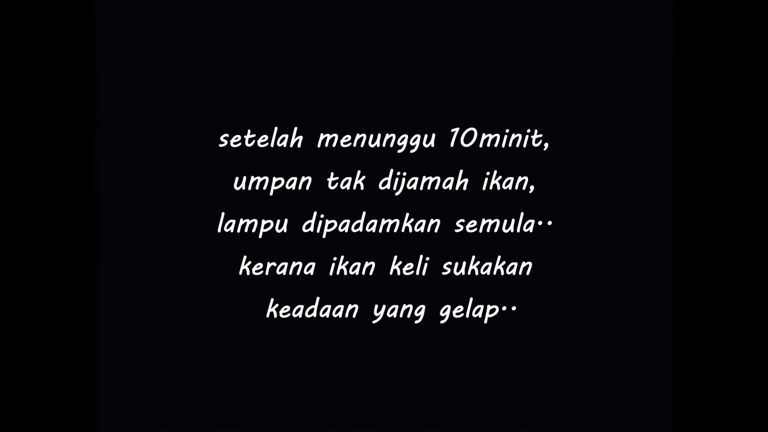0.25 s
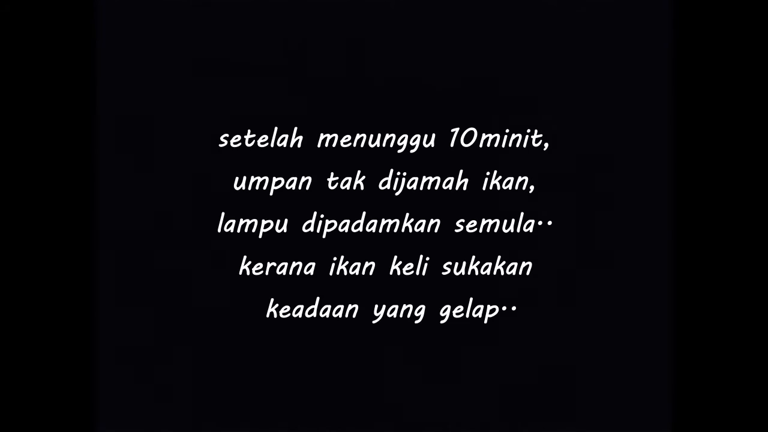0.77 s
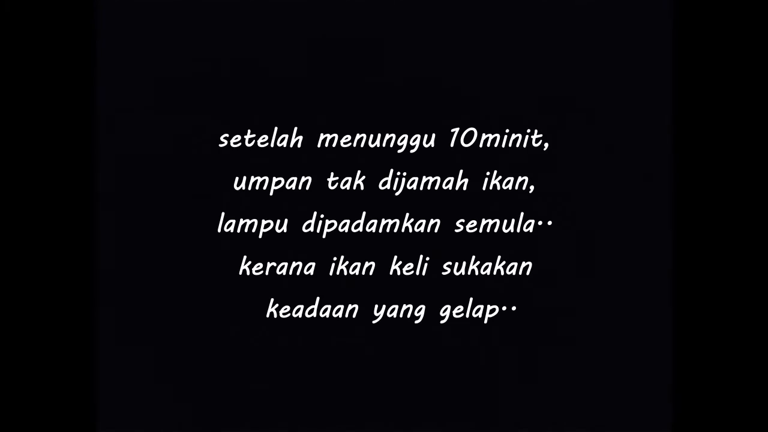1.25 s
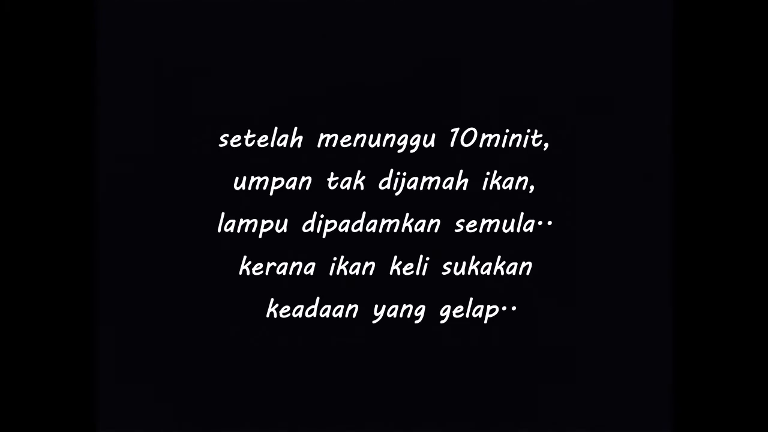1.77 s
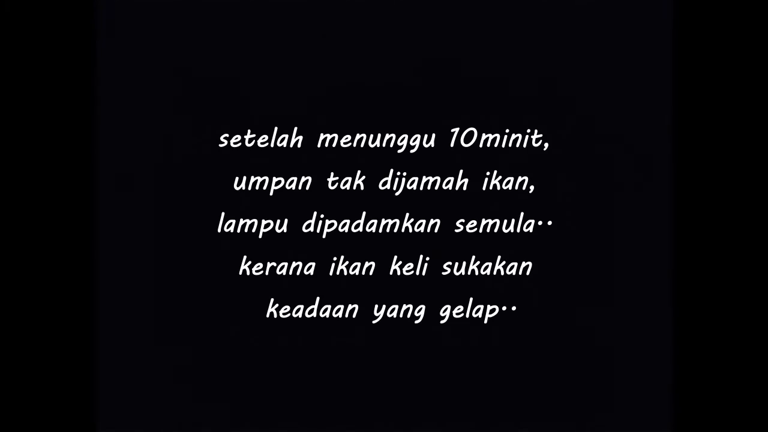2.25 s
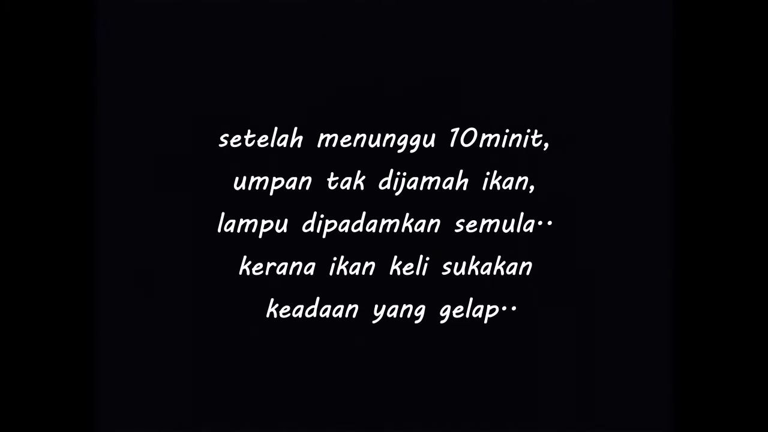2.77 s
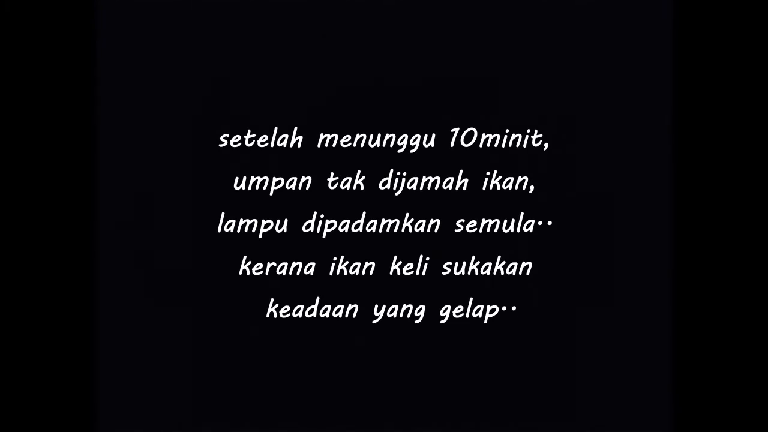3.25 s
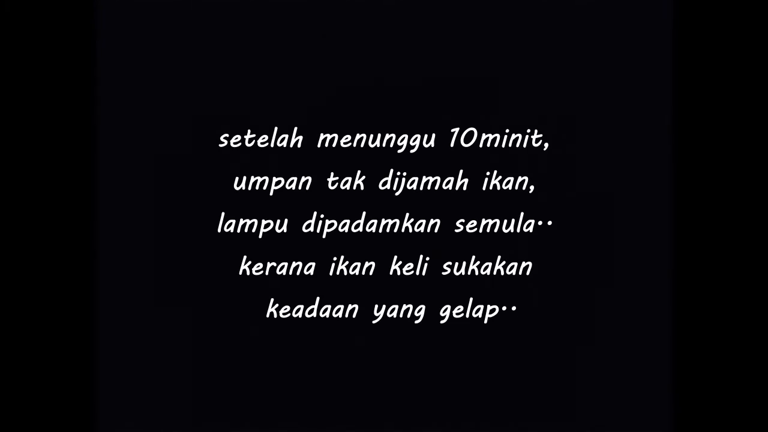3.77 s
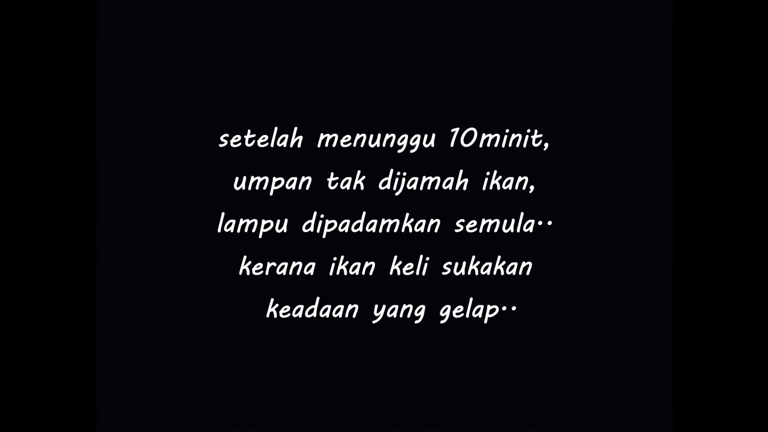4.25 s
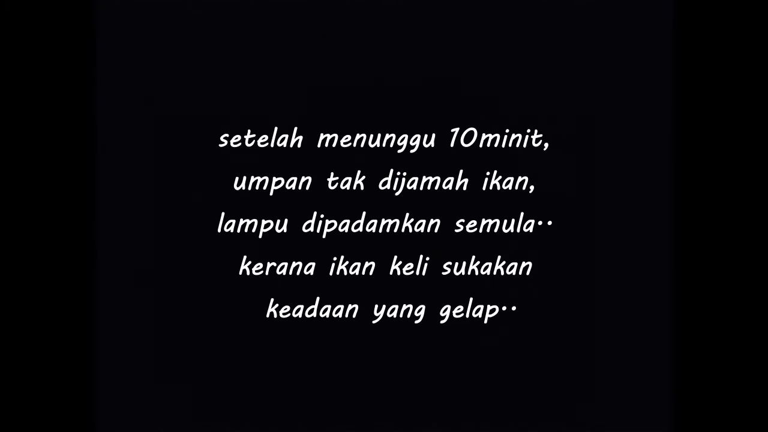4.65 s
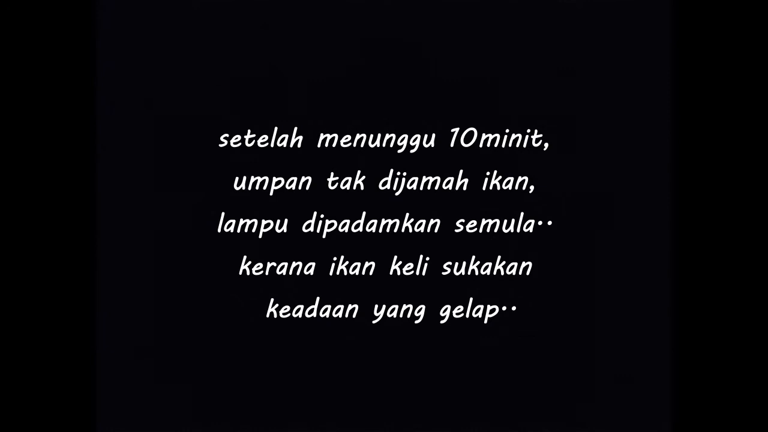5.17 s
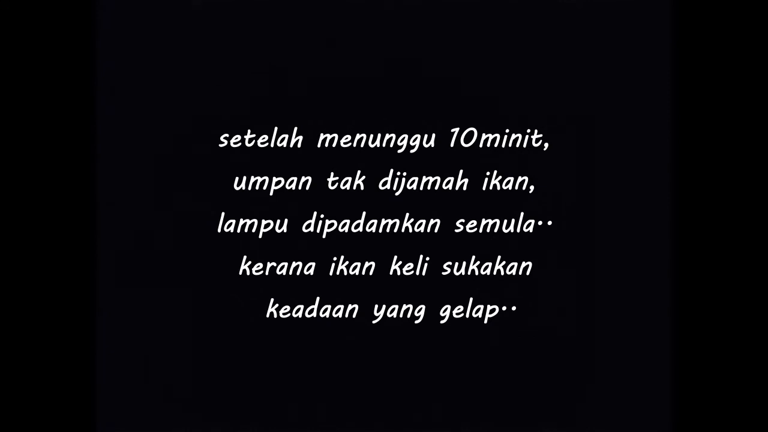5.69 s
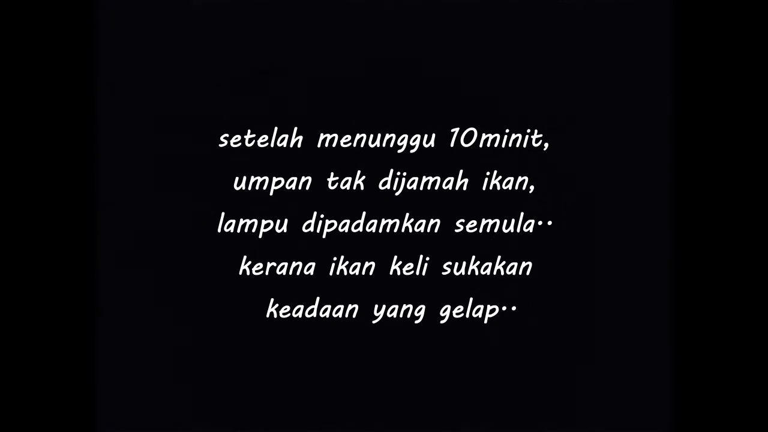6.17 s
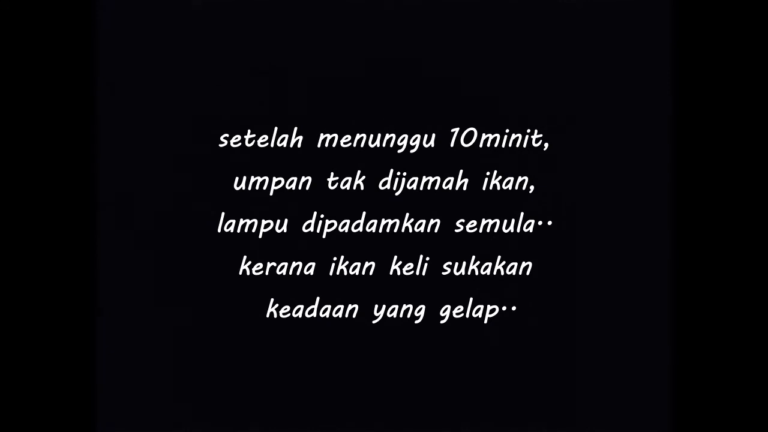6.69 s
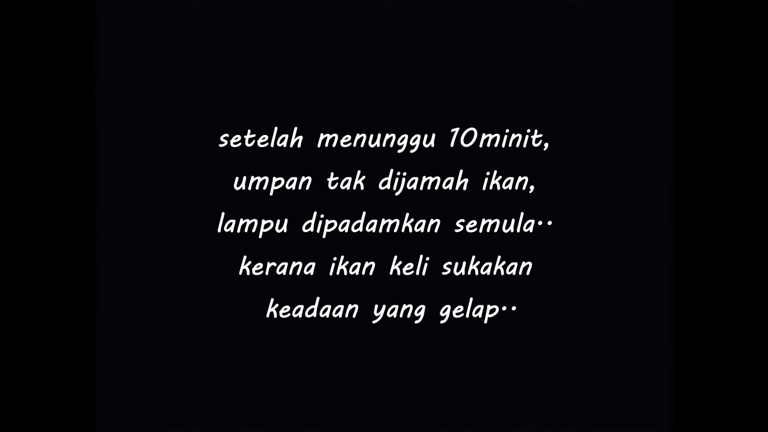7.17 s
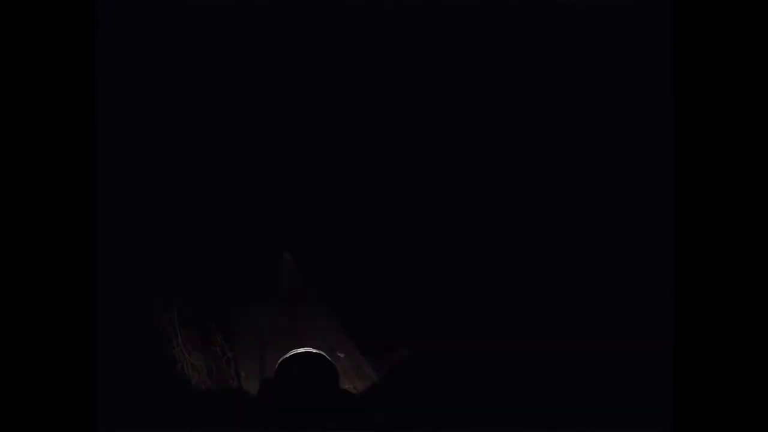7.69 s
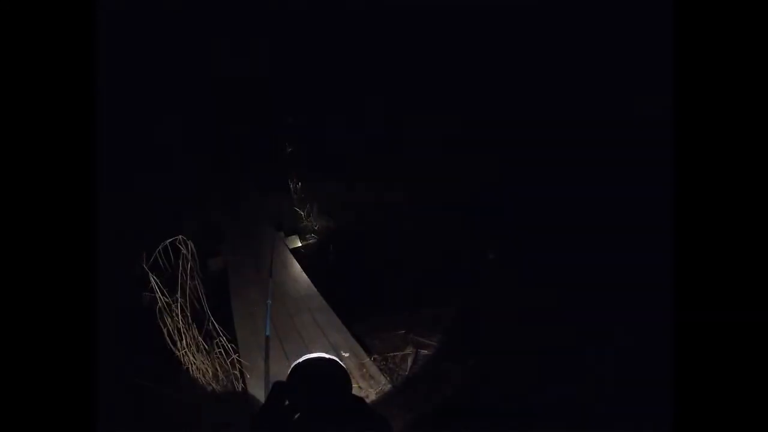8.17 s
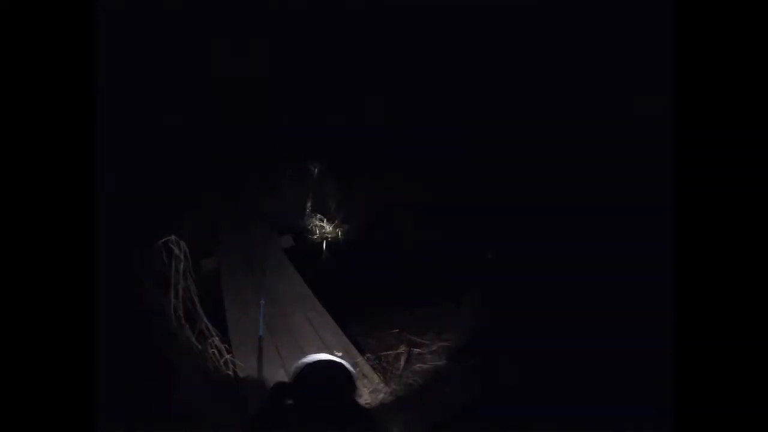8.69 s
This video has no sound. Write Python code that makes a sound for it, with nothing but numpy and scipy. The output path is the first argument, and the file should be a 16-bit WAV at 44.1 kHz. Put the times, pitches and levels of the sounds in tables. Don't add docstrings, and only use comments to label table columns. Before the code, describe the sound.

A quiet night outdoors beside a ditch. From 0 s a dense far insect chorus hisses above low rumbling traffic, with a motor swelling around 1.3 s. A cricket trills roughly 28 strokes a second, stronger from 1.7 to 2.5 s, resting until about 3.4 s, then running on. Mid-distance crickets chirp in threes early and again after 6.5 s; katydids buzz in short bursts, and a faint far frog croaks every second or so. Between 5.6 and 6.3 s a close field cricket gives bright falling chirps. At about 7.26 s the whole night abruptly becomes much louder. Fingers rub and tick a small plastic lamp close to the microphone until 7.8 s, with hard overloaded switch snaps at 7.58 and 7.77 s. A very brief dip follows, then loud overlapping chirps, motor hum and the trill returning at 8.2 s, continuing to 8.9 s.

```python
import sys
import numpy as np
from scipy import signal
from scipy.fft import rfft, irfft, next_fast_len
from scipy.io import wavfile
from scipy.ndimage import uniform_filter1d

SR = 44100
rng = np.random.default_rng(int(sys.argv[2]) if len(sys.argv) > 2 else 0)


def voltage_ratio(decibels):
    exponent = np.asarray(decibels, float) / 20
    return 10 ** exponent


def unload_audio(sound):
    columns = np.transpose(np.atleast_2d(sound))
    steps = np.round(np.clip(columns, -1, 1) * 32767)
    wavfile.write(sys.argv[1], SR, steps.astype(np.int16))


N = 393813
TIME = np.arange(N) / SR
PADDED = next_fast_len(N)
LOUDER_S, LOUDER_DB = 7.2567, 19


def noise():
    return rng.standard_normal(N)


def curve(rows, outside_db=None):
    s, db = np.transpose(rows)
    return np.interp(TIME, s, db, left=outside_db, right=outside_db)


def passband(x, low_hz, high_hz, order=2):
    return signal.sosfilt(signal.butter(order, [low_hz, high_hz], "band", fs=SR, output="sos"), x)


def band(x, low_hz, high_hz, order=2):
    out = passband(x, low_hz, high_hz, order)
    return out / np.sqrt(np.mean(out ** 2))


def coloured(x, spectrum):
    hz, db = np.transpose(spectrum)
    bins = np.fft.rfftfreq(PADDED, 1 / SR) + 1e-9
    gain = voltage_ratio(np.interp(np.log(bins), np.log(hz), db, left=-90, right=-90))
    out = irfft(rfft(x, PADDED) * gain, PADDED)[:N]
    return out / np.sqrt(np.mean(out ** 2))


def drift(rate):
    knots = rng.standard_normal(int(N / SR * rate) + 2)
    return np.interp(TIME * rate, np.arange(len(knots)), knots) * np.sqrt(3 / 2)


def place(rows, shape):
    s, db = np.transpose(rows)
    marks = np.zeros(N)
    np.add.at(marks, np.clip((s * SR).astype(int), 0, N - 1), voltage_ratio(db))
    return signal.fftconvolve(marks, shape, "same")


def beats(rows, jitter_s, jitter_db):
    s, per_s, db = np.transpose(rows)
    runs = []
    for a, b, rate in zip(s, s[1:], per_s):
        count = max(round((b - a) * rate), 1)
        runs.append(np.linspace(a, b, count, endpoint=False))
    at = np.append(np.concatenate(runs), s[-1])
    jitter = rng.standard_normal((len(at), 2)) * [jitter_s, jitter_db]
    return np.transpose([at, np.interp(at, s, db)]) + jitter


def chirps(rows, strokes):
    return (np.array(rows)[:, None] + strokes).reshape(-1, 2)


def stroke(start_hz, end_hz, length, bend=1.0, peak_at=0.95, pointed=1.75):
    part = np.linspace(0, 1, int(length * SR))
    phase = 2 * np.pi * np.cumsum(start_hz + (end_hz - start_hz) * part ** bend) / SR
    swell = np.abs(np.sin(np.pi * part ** peak_at)) ** pointed
    return swell * np.sin(phase)


def scatter(x, t60, wet_db):
    age = np.arange(int(t60 * SR)) / SR
    echoes = rng.standard_normal(len(age)) * voltage_ratio(-60 * age / t60) * np.minimum(age / 0.015, 1)
    echoes /= np.sqrt(np.sum(echoes ** 2))
    return x + voltage_ratio(wet_db) * signal.fftconvolve(x, echoes)[:N]


# frequency in Hz, density in dB per Hz.
AIR_COLOUR = [(12, -59), (20, -11), (65, -2), (129, -15.5), (145, -7), (161, -4), (189, -10), (276, -25),
              (556, -30.5), (814, -23), (1010, -32), (1670, -34), (2400, -35), (3120, -68), (5280, -120)]


def air():
    return voltage_ratio(-59.5) * coloured(noise(), AIR_COLOUR)


# time in seconds, level in dB above its usual.
TRAFFIC_SWELL = [(0, -2.5), (1.1, 11.5), (1.87, -1), (2.5, 5.5), (3.2, -7), (3.9, 4.5), (4.5, -7), (5.6, 6),
                 (5.9, -3.5), (7.25, -6), (7.28, 4.5), (8.93, 3.5)]
# low edge in Hz, high edge in Hz, usual level in dB, share of the traffic's swing.
MOTOR_HUMS = [(58.9, 67.3, -67, 1.0), (81.3, 88, -71, 0.77), (153.7, 160, -66, -0.43),
              (127.5, 142, -75, 0.96), (102.5, 110, -75.5, 0.85)]


def motors():
    near_db = curve(TRAFFIC_SWELL)
    return sum(voltage_ratio(db + share * near_db) * band(noise(), low_hz, high_hz)
               for low_hz, high_hz, db, share in MOTOR_HUMS)


# time in seconds, firing rate in Hz, level in dB.
ENGINE_COURSES = [
    [(0.35, 93.1, -78), (0.5, 93.1, -68), (1.33, 91.6, -52), (1.64, 91.9, -61), (1.8, 89.8, -73)],
    [(7.25, 58.0, -57), (7.86, 62.0, -53), (8.32, 64.5, -50), (8.5, 59.0, -57), (8.62, 54.0, -72)],
    [(7.25, 84.94, -67.5), (8.1, 85.6, -65), (8.93, 83.7, -75)],
]
# multiple of the firing rate, level in dB.
ENGINE_OVERTONES = [
    [(1, -3), (1.5, -6), (2, -10.5)],
    [(1, -0.5), (2, -15.5), (3, -25.5)],
    [(1, 4.5), (1.25, -15), (1.8, -3)],
]


def engines():
    out = 0
    for course, orders in zip(ENGINE_COURSES, ENGINE_OVERTONES):
        s, hz, db = np.transpose(course)
        turn = 2 * np.pi * np.cumsum(np.interp(TIME, s, hz) * (1 + 0.0124 * drift(5))) / SR
        tones = sum(voltage_ratio(order_db + 2.0 * drift(4.2)) * np.sin(multiple * turn) for multiple, order_db in orders)
        out = out + np.sqrt(2) * voltage_ratio(np.interp(TIME, s, db, left=-140, right=-140)) * tones
    return out


# middle in seconds, length in seconds, pitch in Hz, level in dB.
FAR_WHINES = [
    (0.07, .2, 652, -74),
    (1.15, .45, 597, -78),
    (2.02, 0.22, 597, -76),
    (3.4, .5, 598, -80),
    (2.66, .15, 395, -80),
    (8.0, 0.1, 500, -77),
    (8.267, 0.25, 360, -76),
]


def whines():
    out = 0
    for s, length, hz, db in FAR_WHINES:
        swell = np.cos(np.pi * np.clip((TIME - s) / length, -0.5, 0.5))
        out = out + voltage_ratio(db) * swell * np.sin(2 * np.pi * hz * TIME)
    return out


def crowd(per_s, start_hz, end_hz, length):
    strokes = (rng.random(N) < per_s / SR) * voltage_ratio(1.6 * noise())
    song = signal.fftconvolve(strokes, stroke(start_hz, end_hz, length), "same")
    out = scatter(song, t60=0.15, wet_db=-4)
    return out / out.std()


# frequency in Hz, density in dB per Hz.
CHORUS_COLOUR = [(2300, -54.5), (2800, -14.5), (3250, -7), (3800, -26.5), (4350, -5.5), (4650, -0.5),
                 (5300, -2.5), (5650, -12), (6050, -22.5), (6450, -7), (6850, -7.5), (7150, -9),
                 (9300, -12.5), (10300, -28), (11500, -45)]
# time in seconds, level in dB.
SLOW_SWELL = [(0, -40.5), (1.5, -41), (2.6, -42.5), (3.3, -43.5), (3.6, -43), (5.6, -40.5), (6.5, -42.5),
              (7.2, -41), (7.7, -43.5), (8.15, -44.5), (8.93, -41.5)]
FIELD_SWELL = [(0, -45), (1.5, -45.5), (5.6, -47), (6.5, -45.5), (7.7, -45.5), (8.2, -48), (8.93, -45.5)]
HIGH_SWELL = [(0, -43), (4.5, -42.5), (7.2, -43.5), (7.7, -44), (8.2, -43.5), (8.93, -43.5)]


def chorus():
    hiss = coloured(noise(), CHORUS_COLOUR)
    low = voltage_ratio(-16) * crowd(60.0, 3500, 2900, 0.04)
    low += voltage_ratio(-24) * crowd(18.0, 3050, 2600, 0.05)
    middle = voltage_ratio(-9.5) * crowd(130.0, 5750, 4500, 0.028)
    high = voltage_ratio(-13) * crowd(160.0, 7150, 6350, 0.012)
    high += voltage_ratio(-14) * crowd(200.0, 8800, 7200, 0.015)
    layers = [(2000, 3750, SLOW_SWELL, low, 1.5),
              (3750, 6050, FIELD_SWELL, middle, 1.1),
              (6050, 9900, HIGH_SWELL, high, 0.8),
              (9900, 12000, HIGH_SWELL, 0, 1.0)]
    out = 0
    for low_hz, high_hz, swell, singers, patchy_db in layers:
        sos = signal.butter(3, [low_hz, high_hz], "band", fs=SR, output="sos")
        part = signal.sosfiltfilt(sos, hiss)
        out = out + (part + singers) * voltage_ratio(curve(swell) + patchy_db * drift(3))
    return out


# pitch in Hz, early level in dB rms, late level in dB rms.
TRILLER_LINES = [(4408, -72, -64), (4478, -66, -62), (4545, -65, -68), (4619, -60, -61), (4694, -62, -62),
                 (5427, -67, -68), (5559, -59, -68), (5645, -70, -70), (5685, -64, -64), (5773, -72, -76),
                 (5812, -68, -70), (5905, -73, -76), (5947, -70, -76), (6035, -78, -74)]


def fast_trillers():
    out = 0
    for hz, early_db, late_db in TRILLER_LINES:
        db = np.where(TIME > LOUDER_S, late_db, early_db) + 2.5 + 2.3 * drift(4.5)
        out = out + voltage_ratio(db) * np.sin(2 * np.pi * hz * TIME + 1.0 * drift(4.4))
    return out


# middle of the croak in seconds, level in dB.
FROG_CROAKS = [
    (1.17, -66),
    (2.38, -68),
    (3.67, -66),
    (5.08, -66),
    (6.55, -68),
    (7.84, -74),
    (8.9, -64.5),
]


def frog():
    return place(FROG_CROAKS, np.hanning(int(0.27 * SR))) * band(noise(), 2080, 2600, order=1) * voltage_ratio(-3.5)


# middle of the swell in seconds, swells per second, level in dB.
RASP_SWELLS = [
    (3.25, 1.4, -70),
    (4.69, 1.41, -68),
    (6.82, 0, -69),
]


def rasp():
    swell = np.sin(np.pi * np.linspace(0, 1, int(0.45 * SR)) ** 2.5) ** 2
    return place(beats(RASP_SWELLS, jitter_s=0.01, jitter_db=4.0), swell) * band(noise(), 10150, 10700)


def buzz(rows, start_hz, end_hz, length, per_s, duty, wet_db, waver=0.02):
    beat = np.cumsum(per_s * (1 + waver * drift(6))) / SR
    scrapes = np.diff(np.floor(beat), prepend=0) * voltage_ratio(2.0 * drift(90))
    burst = signal.windows.tukey(int(length * SR), 0.55)
    gate = place(beats(rows, jitter_s=0.005, jitter_db=0.7), burst)
    song = signal.fftconvolve(gate * scrapes, stroke(start_hz, end_hz, duty / per_s), "same")
    return scatter(song, t60=0.06, wet_db=wet_db)


# middle of the burst in seconds, bursts per second, level in dB.
HIGH_BURSTS = [(0.025, 7.6, -52.5), (0.678, 7.6, -53), (1.204, 0, -52), (1.43, 7.9, -53), (2.188, 7.8, -53),
               (2.826, 0, -53), (2.97, 7.6, -53), (3.757, 7.8, -50.5), (4.265, 7.6, -51), (5.19, 7.3, -51),
               (5.871, 7.6, -52), (7.195, 7.3, -52), (7.332, 7.2, -55), (7.745, 7.7, -55),
               (8.914, 0, -55.5)]
LOW_BURSTS = [
    (0.13, 4.8, -58),
    (1.382, 4.8, -57),
    (2.422, 4.85, -56.5),
    (4.497, 4.85, -56.5),
    (7.166, 0, -57.5),
    (7.33, 4.8, -59.5),
    (8.8, 0, -58.5),
]
SLOW_BURSTS = [
    (0.07, 3.0, -49),
    (1.39, 3, -50),
    (2.08, 3.1, -52.5),
    (4.036, 3.1, -51.5),
    (5.93, 3.1, -51),
    (7.22, 3.1, -52),
    (8.803, 0, -53.5),
]


def katydids():
    high = buzz(HIGH_BURSTS, 10200, 8450, 0.105, per_s=121, duty=0.9, wet_db=-3, waver=0.035)
    low = buzz(LOW_BURSTS, 4600, 3650, 0.15, per_s=83, duty=0.7, wet_db=-5)
    swells = place(beats(SLOW_BURSTS, jitter_s=0.01, jitter_db=1.0), np.hanning(int(0.3 * SR)))
    breath = swells * band(noise(), 7500, 8820, order=4) * voltage_ratio(-4.5)
    scrape = buzz(SLOW_BURSTS, 8520, 7900, 0.25, per_s=202.6, duty=0.9, wet_db=-3, waver=0.004)
    return voltage_ratio(6.5) * high + voltage_ratio(5.0) * low + voltage_ratio(3.5) * breath + voltage_ratio(2.5) * scrape


# time in seconds, peak level in dB.
SLOW_SINGLES = [(2.546, -53), (2.607, -54), (2.672, -47), (2.745, -46), (2.92, -50), (2.989, -46),
                (3.065, -45), (3.13, -53), (3.2, -53), (3.318, -47), (7.65, -51), (7.715, -52),
                (7.753, -52), (7.825, -51), (7.858, -52), (7.886, -48), (7.905, -52), (7.935, -53),
                (7.959, -48), (8.015, -53), (8.16, -53)]
# last stroke of the chirp in seconds, peak level in dB.
LOW_CHIRPS = [(0.17, -63), (0.326, -57), (0.806, -58), (1.425, -59), (2.02, -60), (2.163, -59), (2.63, -58),
              (3.212, -57), (3.318, -59), (3.748, -55), (3.907, -58), (4.472, -60), (4.88, -57),
              (5.07, -60), (5.307, -59), (5.728, -59), (5.982, -59), (6.263, -60), (6.967, -57),
              (7.494, -60), (7.86, -59), (8.039, -60), (8.6, -60)]
# seconds from the chirp's time, level in dB.
LOW_PATTERN = [
    (-0.14, -6),
    (-0.07, -2.5),
    (0, 0),
]


def slow_crickets():
    slow = voltage_ratio(2.5) * place(SLOW_SINGLES, stroke(3470, 2880, 0.042))
    low = voltage_ratio(1.5) * place(chirps(LOW_CHIRPS, LOW_PATTERN), stroke(2950, 2480, 0.052))
    return scatter(slow + low, t60=0.24, wet_db=-17)


# middle stroke in seconds, chirps per second, peak level in dB.
FIELD_CHIRPS = [
    (0.066, 4.43, -38.5),
    (0.969, 4.43, -38.5),
    (1.194, 0, -39),
    (1.885, 4.3, -45),
    (2.116, 0, -44.5),
    (6.563, 4.43, -41),
    (7.24, 0, -41),
]
# seconds from the chirp's time, level in dB.
FIELD_PATTERN = [
    (-0.042, -3),
    (0, 0),
    (0.042, 0),
]
# stroke in seconds, peak level in dB.
FIELD_ANSWERS = [(0.081, -47.5), (0.126, -47.5), (0.27, -48.5), (0.31, -48.5), (0.43, -46.5),
                 (0.592, -48.5), (0.794, -44.5), (0.816, -47.5), (0.836, -48.5), (1.001, -44.5),
                 (1.026, -47.5), (1.226, -46.5), (1.288, -47.5), (1.314, -47.5), (1.379, -43.5),
                 (1.42, -37.5), (1.653, -46.5), (2.209, -48.5), (2.393, -48.5), (2.434, -39.5),
                 (2.478, -46.5), (2.661, -42.5), (2.676, -47.5), (2.703, -44.5), (2.716, -48.5),
                 (2.848, -46.5), (2.89, -46.5), (2.906, -48.5), (2.929, -44.5), (2.945, -48.5),
                 (3.696, -48.5), (4.688, -48.5), (5.927, -41.5), (6.13, -43.5), (6.153, -41.5),
                 (6.214, -47.5), (6.349, -48.5), (6.379, -39.5), (6.395, -48.5), (6.411, -47.5),
                 (6.621, -47.5), (6.765, -47.5), (6.862, -44.5), (6.991, -48.5), (7.073, -46.5),
                 (7.104, -44.5), (7.146, -46.5)]
FIELD_OVERLAPS = [(7.281, -44.5), (7.414, -43.5), (7.433, -38.5), (7.443, -38.5), (7.485, -38.5),
                  (7.5, -46.5), (7.614, -41.5), (7.67, -40.5), (7.686, -46.5), (7.712, -38.5),
                  (7.757, -42.5), (7.797, -44.5), (7.819, -47.5), (7.856, -44.5), (7.898, -39.5),
                  (7.94, -42.5), (7.954, -47.5), (7.977, -41.5), (8.118, -41.5), (8.128, -42.5),
                  (8.141, -42.5), (8.158, -40.5), (8.17, -36.5), (8.181, -42.5), (8.343, -42.5),
                  (8.358, -41.5), (8.383, -40.5), (8.399, -37.5), (8.442, -37.5), (8.546, -47.5),
                  (8.564, -44.5), (8.584, -42.5), (8.625, -39.5), (8.667, -41.5), (8.679, -46.5),
                  (8.703, -42.5), (8.744, -40.5), (8.766, -46.5), (8.81, -42.5), (8.851, -38.5),
                  (8.894, -38.5), (8.911, -46.5), (8.924, -42.5)]


def field_crickets():
    regular = chirps(beats(FIELD_CHIRPS, jitter_s=0.00056, jitter_db=1.1), FIELD_PATTERN)
    rows = np.vstack([regular, FIELD_ANSWERS, FIELD_OVERLAPS])
    return voltage_ratio(1.8) * scatter(place(rows, stroke(5850, 4500, 0.027)), t60=0.2, wet_db=-8)


# stroke in seconds, peak level in dB, octave level in dB.
NEAR_STROKES = [(5.617, -41, -64), (5.662, -32, -50), (5.797, -38, -54), (5.841, -25, -63),
                (5.884, -23.5, -63), (6.019, -34, -54), (6.062, -24, -60), (6.104, -24, -67),
                (6.241, -34, -54), (6.284, -24.5, -64), (6.326, -24.5, -62), (7.34, -38, -55),
                (7.382, -27, -67)]


def near_cricket():
    rows = np.array(NEAR_STROKES)
    main, octave_rows = rows[:, :2], rows[:, ::2]
    flick = voltage_ratio(-15) * place(main + [-0.0105, 0], stroke(6900, 5900, 0.008, bend=0.7))
    close = place(main, stroke(6340, 4577, 0.029, bend=0.83, peak_at=0.79, pointed=2.55))
    tail = voltage_ratio(-14) * place(main + [0.009, 0], stroke(5050, 4300, 0.016))
    octave = place(octave_rows + [0.004, 0], stroke(12300, 9100, 0.028, bend=0.7, peak_at=0.8))
    return scatter(flick + close + tail + octave, t60=0.18, wet_db=-16.5)


# time in seconds, strokes per second, peak level in dB.
TRILL_RUNS = [(0.025, 30.1, -45.5), (0.125, 28.4, -47.0), (0.195, 29.4, -42.5), (0.332, 27.2, -44.0),
              (0.442, 29.4, -43.5), (0.51, 28.4, -42.5), (0.651, 29.2, -45.5), (0.924, 28.0, -45.5),
              (1.032, 29.1, -42.5), (1.1, 27.1, -43.5), (1.248, 22.6, -42.0), (1.337, 25.0, -44.0),
              (1.416, 28.7, -42.0), (1.451, 29.7, -40.0), (1.687, 28.9, -35.5), (1.929, 27.3, -35.5),
              (2.002, 29.6, -35.5), (2.172, 28.2, -35.5), (2.349, 26.0, -35.0), (2.426, 22.1, -35.5),
              (2.516, 0.0, -36), (3.372, 27.2, -45), (3.446, 29.0, -39), (3.515, 29.6, -37.5),
              (3.751, 28.6, -37.5), (3.891, 29.6, -38.0), (4.094, 28.3, -38.5), (4.2, 25.6, -38.0),
              (4.239, 22.1, -38.5), (4.375, 24.4, -40.5), (4.457, 29.8, -40.5), (4.658, 29.4, -38.0),
              (4.828, 28.4, -39.5), (5.075, 25.6, -39.5), (5.153, 27.6, -40.0), (5.261, 29.6, -39.5),
              (5.396, 30.7, -40.0), (5.462, 29.1, -43.0), (5.565, 28.7, -39.5), (5.704, 23.9, -41.5),
              (5.997, 28.4, -41.0), (6.067, 30.4, -42.0), (6.166, 29.5, -43.0), (6.403, 28.5, -41.5),
              (6.509, 25.2, -42.0), (6.667, 30.3, -41.0), (6.799, 28.1, -43.0), (6.942, 29.1, -40.5),
              (7.216, 28.6, -41.0), (7.251, 45.0, -40.5), (7.273, 27.9, -40.5), (7.488, 23.8, -40.5),
              (7.572, 21.6, -40.5), (7.618, 0.0, -41), (8.196, 27.5, -48), (8.269, 29.7, -40.5),
              (8.673, 29.6, -38.0), (8.774, 28.0, -39.0), (8.881, 30.7, -39.5), (8.914, 0.0, -38.5)]


def triller():
    rows = beats(TRILL_RUNS, jitter_s=0.0005, jitter_db=1.2)
    song = place(rows, stroke(3440, 3020, 0.026, bend=1.45, peak_at=0.8, pointed=1.0))
    return voltage_ratio(0.5) * scatter(song, t60=0.14, wet_db=-11)


# time in seconds, level in dB.
RUB_SWELL = [(7.257, -60), (7.27, -48), (7.31, -39), (7.35, -43), (7.42, -48), (7.47, -56), (7.6, -53),
             (7.66, -57), (7.72, -53), (7.76, -55), (7.82, -48), (7.87, -62)]


def rub():
    slips = (rng.random(N) < 0.03) * noise() * voltage_ratio(3.0 * drift(120))
    return voltage_ratio(curve(RUB_SWELL, outside_db=-140)) * band(slips, 520, 2500)


# time in seconds, peak level in dB, shell ring in Hz, rattle in dB, hollow in dB.
LAMP_TICKS = [(7.2675, -39, 1520, 3, -18), (7.291, -34, 1460, 3, -14), (7.305, -25, 2030, 0, -20),
              (7.321, -23, 2000, -3, -23), (7.3352, -28, 1500, 3.5, -17), (7.345, -33, 2000, 0, -22),
              (7.368, -21.5, 1500, 4, -21), (7.3905, -22.5, 1510, 5, -14), (7.4868, -19, 1830, 2, -22),
              (7.5474, -15.5, 1510, -1.5, -18.5), (7.5845, -25, 1500, -11, -22),
              (7.605, -21, 2010, -8, -28), (7.712, -21, 1620, -10, -20), (7.7183, -23, 1500, -8, -14),
              (7.729, -26, 1720, -4, -22), (7.766, -38, 2300, 0, -19), (7.775, -13, 1450, -1, -21),
              (7.7985, -12, 1800, -6, -31)]


def lamp():
    out, age = np.zeros(N), np.arange(3000) / SR
    hollow = np.sin(2 * np.pi * 730 * age) * voltage_ratio(-60 * age / 0.1)
    for s, db, hz, rattle_db, hollow_db in LAMP_TICKS:
        grit = rng.standard_normal(3000) * (0.5 * voltage_ratio(-60 * age / 0.012) + 0.07 * voltage_ratio(-60 * age / 0.1))
        click = 9.0 * (age == 0)
        rattle = passband(click + grit, 620, 2800)
        shell = 0.21 * np.sin(2 * np.pi * hz * age) * voltage_ratio(-60 * age / 0.018)
        rings = (shell + voltage_ratio(hollow_db) * hollow) * np.minimum(age / 0.0018, 1)
        out[int(s * SR):][:3000] += voltage_ratio(db) * (rings + voltage_ratio(rattle_db) * rattle)
    return out


# time in seconds, peak level in dB, low and high mode in Hz, high against low in dB.
SWITCH_SNAPS = [
    (7.562, -13.5, 2610, 4200, 9),
    (7.5824, -0.5, 2370, 4100, 0),
    (7.583, 4, 2100, 4190, 8.5),
    (7.5854, -0.5, 3030, 3740, -7),
    (7.7745, 5, 2264, 4545, -0.5),
    (7.7774, -11, 2860, 5000, 5),
]


def switch():
    out, age = np.zeros(N), np.arange(600) / SR
    for s, db, low_hz, high_hz, high_db in SWITCH_SNAPS:
        modes = np.sin(2 * np.pi * low_hz * age)
        modes += voltage_ratio(high_db) * np.sin(2 * np.pi * high_hz * age)
        modes += 0.55 * np.sin(2 * np.pi * 7400 * age)
        crack = 0.41 * rng.standard_normal(600) * voltage_ratio(-60 * age / 0.0036)
        snap = modes * voltage_ratio(-60 * age / 0.0059) + crack
        out[int(s * SR):][:600] += voltage_ratio(db) * snap * np.minimum(age / 0.00037, 1)
    return passband(out, 1300, 10500)


# start in seconds, end in seconds, level in dB.
GAIN_DUCKS = [
    (7.778, 7.7975, -9),
]


def scene():
    far = air() + motors() + engines() + whines() + chorus() + fast_trillers()
    singers = frog() + rasp() + katydids() + slow_crickets() + field_crickets() + near_cricket() + triller()
    duck_db = sum(db * ((TIME > a) & (TIME < b)) for a, b, db in GAIN_DUCKS)
    volume_db = LOUDER_DB * (TIME > LOUDER_S) + uniform_filter1d(duck_db, size=130)
    edges = np.minimum(np.minimum(TIME, TIME[::-1]) / 0.00058, 1)
    night = (far + singers) * voltage_ratio(volume_db) * edges
    return (night + rub() + lamp() + switch())[None]


def band_limit(x):
    return signal.sosfilt(signal.butter(12, 15720, fs=SR, output="sos"), x)


def record(dry):
    x = np.clip(dry[0], -1, 1)
    top = signal.sosfilt(signal.butter(6, 8300, "high", fs=SR, output="sos"), x)
    backwards = np.conj(signal.hilbert(top, PADDED)[:N])
    image = np.real(backwards * np.exp(2j * np.pi * 24000 * TIME))
    image = signal.sosfilt(signal.butter(4, 12600, fs=SR, output="sos"), image)
    return band_limit((x + voltage_ratio(-13.5) * image)[None])


dry = scene()
out = record(dry)
unload_audio(out)
```